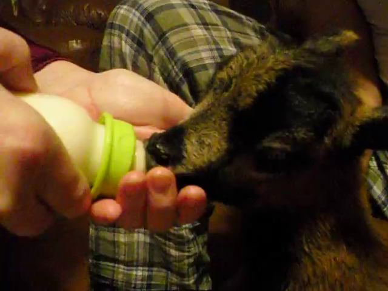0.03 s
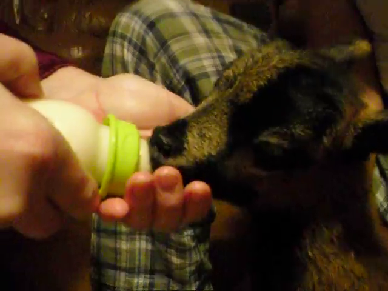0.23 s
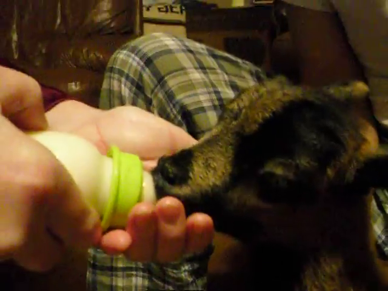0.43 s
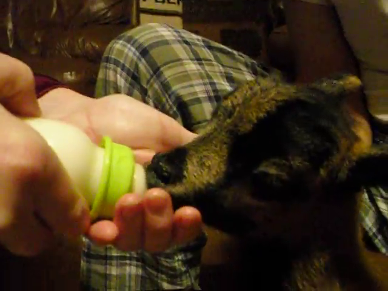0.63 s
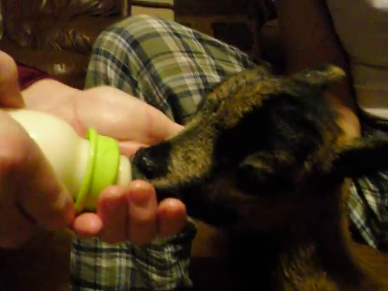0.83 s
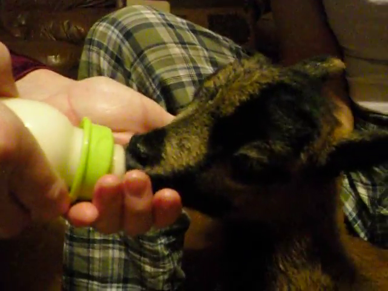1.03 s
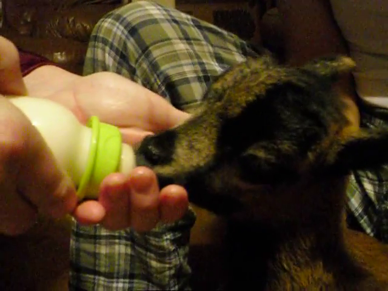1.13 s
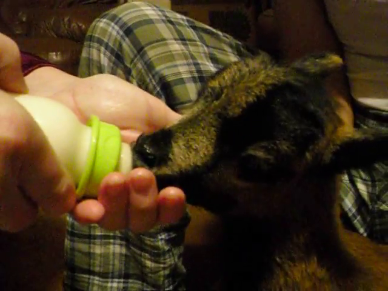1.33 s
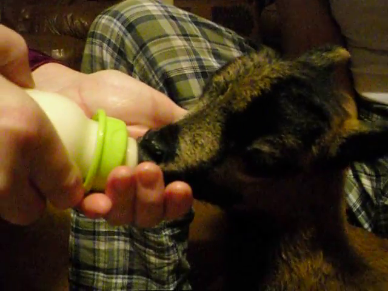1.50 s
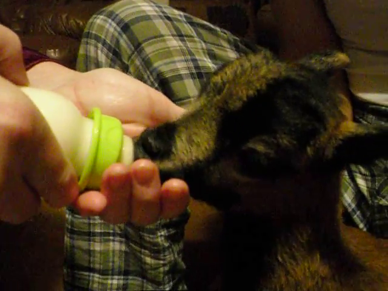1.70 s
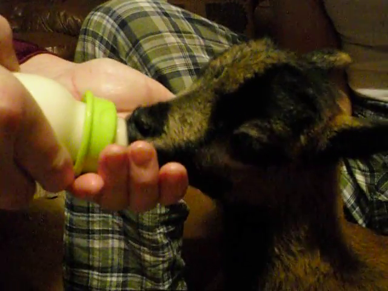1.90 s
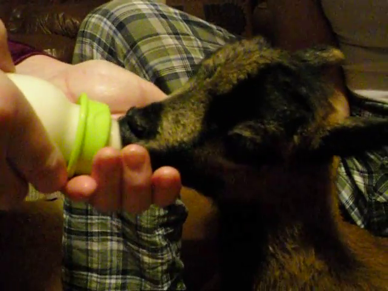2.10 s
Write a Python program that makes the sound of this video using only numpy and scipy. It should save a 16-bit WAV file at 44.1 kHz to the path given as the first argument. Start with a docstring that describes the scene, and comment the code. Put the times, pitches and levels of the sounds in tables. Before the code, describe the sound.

A baby goat sucks wetly at a milk bottle, close by in a quiet room.

```python
"""A soft thump comes first, as the recorder switches on in a quiet, faintly rumbling room.
Close by, a baby goat sucks at the rubber teat of a milk bottle. With each pull, air crackles
through the wet gap between lips and teat, and films of milk pop and make the mouth ring.
Now and then the teat slips and squeaks, the jaw knocks softly, and one small bubble rings."""
import sys
import numpy as np
from scipy import signal
from scipy.fft import rfft, irfft
from scipy.io import wavfile
from scipy.ndimage import uniform_filter1d

SR = 44100
rng = np.random.default_rng(int(sys.argv[2]) if len(sys.argv) > 2 else 0)


def wav_record(signal):
    """Record a signal, one row per channel, as 16-bit PCM in the file named by sys.argv[1]."""
    frames = np.transpose(np.atleast_2d(signal))
    bounded = np.clip(frames, -1, 1)
    # unit amplitude maps onto the largest positive 16-bit level
    quanta = np.round(bounded * 32767).astype(np.int16)
    wavfile.write(sys.argv[1], SR, quanta)


N = 94815
CLICK_GAIN = np.sqrt(0.0012 * SR)  # gives a click the energy of 1.2 ms of steady sound


def undb(db):
    """Turn decibels into a gain to multiply by."""
    return 10 ** (np.asarray(db) / 20)


def unit(x):
    """Scale to an average power of 1."""
    return x / np.sqrt(np.mean(x ** 2) + 1e-30)


def tone_curve(points, size, shift=1):
    """Join (Hz, dB) points into one gain per frequency; shift multiplies their pitch."""
    hz, db = np.array(points).T
    freqs = np.maximum(np.fft.rfftfreq(size, 1 / SR), 1)
    return unit(undb(np.interp(np.log(freqs), np.log(hz * shift), db)))


def ringing(curve):
    """The sound of one sharp tap on something with this tone curve."""
    cepstrum = irfft(np.log(curve + 1e-12))
    half = len(cepstrum) // 2
    folded = np.r_[cepstrum[0], 2 * cepstrum[1:half], np.zeros(half)]  # no ringing before the tap
    return irfft(np.exp(rfft(folded)))


def add(out, start, sound):
    """Mix a sound into out, at a start given in seconds."""
    i = int(np.clip(round(start * SR), 0, N))
    out[i:i + len(sound)] += sound[:N - i]


# The tone of the quiet room. Each row: frequency in Hz, relative level in dB.
RUMBLE_TONE = [(12, -25), (20, 4.5), (65, 0), (310, -9), (1760, -26), (2670, -28.5), (4060, -33),
               (13500, -38.5), (16000, -38.5)]
def room_rumble(level_db=-51.5, waver_db=1.0):
    """Low rumble and faint hiss, wavering slightly."""
    noise = unit(irfft(rfft(rng.standard_normal(N)) * tone_curve(RUMBLE_TONE, N), N))
    waver = uniform_filter1d(rng.standard_normal(N), size=1500)
    waver = unit(uniform_filter1d(waver, size=1500))
    return noise * undb(level_db + waver_db * waver)


def room_echo(sound, gain_db=-19, fade_s=0.37, cutoff_hz=4450, delay_s=0.0023):
    """A furnished room adds a short, dull tail that falls 60 dB in fade_s."""
    t = np.arange(N // 4) / SR
    tail = rng.standard_normal(len(t)) * np.exp(-np.log(1000) * t / fade_s) * (t > delay_s)
    lowpass = signal.butter(2, cutoff_hz, fs=SR, output="sos")
    tail = signal.sosfilt(lowpass, tail / np.linalg.norm(tail))
    return undb(gain_db) * signal.fftconvolve(sound, tail)[:N]


def milk_bubble(start=1.1183, hz=1630, fade_s=0.014, level_db=-46, rise_per_s=8):
    """One small bubble of milk rings in the mouth and glides up slightly."""
    t = np.maximum(np.arange(N) / SR - start, 0)
    fade = np.exp(-np.log(1000) * t / fade_s)
    return undb(level_db) * fade * np.sin(2 * np.pi * hz * t * (1 + rise_per_s * t / 2))


# The tone of a knock. Each row: frequency in Hz, relative level in dB.
KNOCK_TONE = [(40, -28), (130, -1), (300, -1), (600, -12), (1100, -13.5), (2500, -33), (8000, -41)]
# The knocks. Each row: start in seconds, relative level in dB.
JAW_KNOCKS = [(0.3211, -40), (1.032, -48)]
def jaw_knocks():
    """Jaw and tongue make dull taps between pulls."""
    out = np.zeros(N)
    tap = ringing(tone_curve(KNOCK_TONE, size=2048))
    for start, db in JAW_KNOCKS:
        add(out, start, undb(db) * CLICK_GAIN * tap)
    return out


# The three parts of a mouth sound: the hollow of the mouth, the ringing lip gap and fine spray.
# Each row: frequency in Hz, relative level in dB.
HOLLOW_TONE = [(150, -20), (400, -8.5), (830, -6.5), (1250, -1.5), (1600, -3.5), (2000, -8), (2800, -6),
               (6000, -48)]
GAP_TONE = [(800, -41), (2000, -15.5), (2400, -16.5), (2750, -1), (3130, 1.6), (3500, -2.5), (3850, -6.5),
            (4300, -8), (5100, -11), (6000, -6), (7000, -14.5), (8300, -23.5), (9500, -23), (16000, -28.5)]
SPRAY_TONE = [(2500, -19.5), (6000, -13), (8500, -14), (9900, -19.5), (11200, -9.5), (12300, -8.5),
              (13500, -5.5), (14400, 0.5), (15500, -6.5), (17000, -22)]
# The lip gap rings higher or lower as the grip changes. Each row: time in seconds, pitch multiplier.
GAP_PITCH = [(0.2, 1.044), (0.49, 0.95), (0.75, 1.007), (1.37, 1.02), (1.58, 1.045)]
def mouth_click(start, levels, detune=0.02, lag_s=0.000235, lag_corner_hz=5150):
    """One click rings through hollow, gap and spray, each slightly retuned by chance."""
    gap_pitch = np.interp(start, *np.array(GAP_PITCH).T)
    shifts = np.array([1, gap_pitch, 1]) * np.exp(detune * rng.standard_normal(3))
    power = 0
    for tone, db, shift in zip((HOLLOW_TONE, GAP_TONE, SPRAY_TONE), levels, shifts):
        power += (undb(db) * tone_curve(tone, size=1024, shift=shift)) ** 2
    click = ringing(np.sqrt(power))
    # The notes leave the mouth unevenly late; low ones tend to lag most.
    freqs = np.linspace(0, SR / 2, len(power))
    uneven = unit(uniform_filter1d(rng.standard_normal(len(freqs)), size=40))
    lag = lag_s * np.exp(uneven / 2) / np.hypot(1, freqs / lag_corner_hz) ** .5
    phase = 2 * np.pi * np.cumsum(lag) * freqs[1]
    return irfft(rfft(click) * np.exp(-1j * phase))


# The squeaks. Each row: start and length in seconds, slips per second,
# then relative levels of hollow and gap in dB.
TEAT_SQUEAKS = [(0.486, 0.0026, 1140, -51, -39), (1.0092, 0.0017, 1470, -53, -36),
                (1.37, 0.0035, 1560, -51, -33.5), (1.583, 0.0046, 1180, -43.5, -40.5)]
def teat_squeaks(jitter=0.1, scatter_db=2):
    """Wet rubber sticks and slips quickly on the lips; every slip rings the mouth."""
    out = np.zeros(N)
    for start, length, slip_rate, *levels in TEAT_SQUEAKS:
        click = mouth_click(start, levels) * np.sqrt(SR / slip_rate)
        elapsed = 0
        for stretch, strength in rng.standard_normal((10, 2)):
            if elapsed < length:
                add(out, start + elapsed, click * undb(scatter_db * strength))
            elapsed += np.exp(jitter * stretch) / slip_rate
    return out


# The slurps. Each row: start, time until fading, rise time and fade time, all in seconds,
# then relative levels of hollow, gap and spray in dB.
AIR_SLURPS = [(0.184, 0.034, .001, 0.0054, -48.5, -46, -55), (0.462, 0.025, 0.014, 0.0045, -49, -50, -57),
              (0.482, 0.0097, 0.0019, 0.0029, -47.5, -43.5, -68),
              (0.706, 0.045, 0.019, 0.0051, -54.5, -44.5, -50),
              (0.753, 0.025, 0.0017, 0.0037, -60.5, -47, -51),
              (0.781, 0.039, 0.0094, 0.0046, -54.5, -50.5, -66),
              (0.98, 0.046, 0.011, 0.0046, -51.5, -46.5, -50.5),
              (1.237, 0.026, 0.0073, .004, -56, -59, -57.5),
              (1.258, 0.083, 0.0068, 0.0077, -63, -49.5, -40),
              (1.355, 0.021, 0.0046, 0.0024, -57, -45, -51), (1.52, 0.041, 0.0074, 0.009, -65, -66, -61.5),
              (1.55, 0.046, 0.00091, 0.0012, -55, -55.5, -72), (1.786, 0.075, 0.03, 0.015, -72, -51, -39),
              (1.782, 0.025, 0.0022, 0.004, -70, -48.5, -47),
              (1.871, 0.061, 0.036, 0.0034, -73, -53, -43.5), (2.082, 0.08, 0.0043, 0.011, -54.5, -49, -72)]
def air_slurps(gaps=3, crackles_per_s=1700, scatter_db=5.7, hiss_power=0.12, gain_db=-0.06, size=8192):
    """Air drawn past the teat crackles and hisses through several slightly different wet gaps."""
    out, t = np.zeros(N), np.arange(size) / SR
    for start, length, rise, fade, *levels in AIR_SLURPS:
        swell = np.minimum(t / rise, 1) * np.exp(-np.maximum(t - length, 0) / fade)
        for _ in range(gaps):
            bursts = rng.random(size) < crackles_per_s / gaps / SR
            strength = undb(scatter_db * np.clip(rng.standard_normal(size), -2, 1.5))
            crackle = unit(bursts * strength * rng.choice([-1, 1], size))
            hiss = np.sqrt(hiss_power) * rng.standard_normal(size)
            air = unit(crackle + hiss) * swell
            add(out, start, signal.fftconvolve(air, mouth_click(start, levels)))
    return out * undb(gain_db) / np.sqrt(gaps)


# The pops. Each row: start in seconds, then relative levels of hollow, gap and spray in dB.
MILK_POPS = [(0.1856, -44, -38, -54), (0.1969, -50, -36.5, -45), (0.2023, -58, -37, -53),
             (0.2074, -52, -39, -38), (0.2125, -45, -36, -42), (0.2124, -43, -26, -34.5),
             (0.2149, -39.5, -35.5, -40), (0.2163, -36.5, -34, -38), (0.2198, -46.5, -37.5, -51),
             (0.2368, -42.5, -50, -68), (0.243, -48, -52, -66), (0.42, -70, -44.5, -49),
             (0.4638, -52, -51, -70), (0.4765, -47, -38, -65), (0.4815, -48, -39, -58),
             (0.484, -52, -43, -53), (0.489, -51, -41, -51), (0.4918, -53, -43, -61),
             (0.4989, -38.5, -52, -69), (0.7038, -47.5, -47, -71), (0.71, -46, -45, -70),
             (0.7143, -45, -36, -63), (0.724, -49, -43, -56), (0.7302, -61, -40.5, -44),
             (0.7362, -38, -30.5, -37), (0.741, -60, -38, -34), (0.747, -62, -34, -33),
             (0.757, -56, -39, -38), (0.7633, -60, -38, -46), (0.7687, -62, -40, -49),
             (0.7782, -44, -46, -39.5), (0.8001, -40.5, -38, -55), (0.804, -40, -30, -53),
             (0.8146, -46, -35, -69), (0.8197, -46, -36.5, -65), (0.823, -35.5, -47, -70),
             (0.9735, -52, -35, -39), (0.978, -47, -42, -36.5), (0.9862, -56, -44, -57),
             (0.9903, -56, -36.5, -35.5), (1.016, -43, -31, -47), (1.0213, -37.5, -34, -47),
             (1.0412, -44, -47, -70), (1.2372, -58, -44.5, -61), (1.2667, -49, -41, -43),
             (1.2693, -57, -36, -35), (1.2797, -65, -45, -34), (1.319, -58, -45, -41),
             (1.3263, -56, -41, -33), (1.346, -44, -33, -42), (1.3568, -56, -41, -49),
             (1.3646, -50, -47, -55), (1.3708, -42, -37.5, -37), (1.3757, -40, -31, -49),
             (1.377, -54, -44, -56), (1.565, -41, -36.5, -52), (1.5745, -51, -42, -61),
             (1.593, -40, -48, -70), (1.5958, -45, -45.5, -72), (1.7814, -56, -57, -38.5),
             (1.7868, -61, -39, -40), (1.803, -59, -46, -37), (1.8153, -48.5, -50, -31.5),
             (1.8216, -57, -54, -31), (1.835, -58, -50, -31.5), (1.8408, -60, -48, -28),
             (1.859, -40, -42, -33), (1.8615, -52, -38.5, -29), (1.8987, -60, -47, -38),
             (1.9077, -60, -38.5, -45), (1.9186, -61, -36, -34.5), (2.1209, -46, -38.5, -39.5),
             (2.1272, -53, -48, -53), (2.1391, -58, -39, -60), (2.145, -54, -39, -68),
             (2.1478, -44, -33.5, -59)]
def milk_pops(tear_share=0.69, tear_fade_s=0.00064, gain_db=-1, size=200):
    """Films of milk burst at the lips, tear on for an instant and ring the mouth."""
    out, t = np.zeros(N), np.arange(size) / SR
    for start, *levels in MILK_POPS:
        tear = unit(rng.standard_normal(size) * np.exp(-t / tear_fade_s)) * np.sqrt(tear_share / size)
        tear[0] = np.sqrt(1 - tear_share)  # the first snap gets the rest of the energy
        add(out, start, np.convolve(tear, mouth_click(start, levels)))
    return out * undb(gain_db) * CLICK_GAIN


def scene():
    """The goat's mouth close by, with the room behind it."""
    goat = milk_pops() + air_slurps() + teat_squeaks() + jaw_knocks() + milk_bubble()
    return (goat + room_echo(goat) + room_rumble())[None]


SWITCH_ON_S, TREBLE_LIMIT_HZ = 0.1522, 15750
THUMP_DB, THUMP_RISE_S, THUMP_FADE_S = -23, 0.00004, 0.091
def record(dry):
    """The recorder thumps on as its signal jumps and drains away; it also cuts the highest treble."""
    t = np.maximum(np.arange(N) / SR - SWITCH_ON_S, 0)
    thump = undb(THUMP_DB) * np.exp(-t / THUMP_FADE_S) * (1 - np.exp(-t / THUMP_RISE_S))
    switched_on = (dry + thump) * (t > 0)
    lowpass = signal.firwin(301, TREBLE_LIMIT_HZ, fs=SR, window="blackman")
    return signal.fftconvolve(switched_on, lowpass[None], "same")


dry = scene()
out = record(dry)
wav_record(out)
```